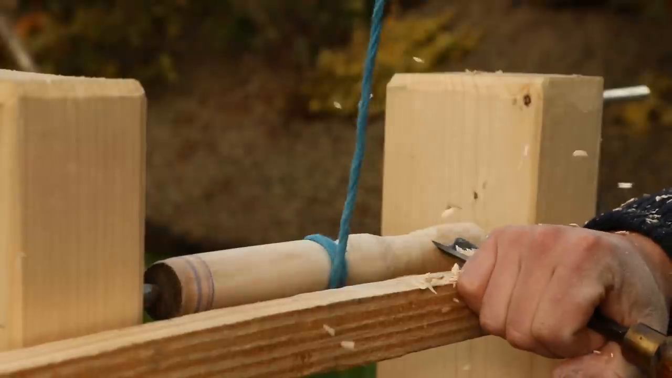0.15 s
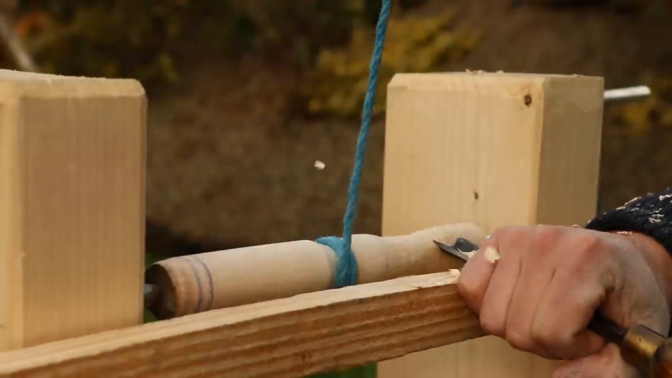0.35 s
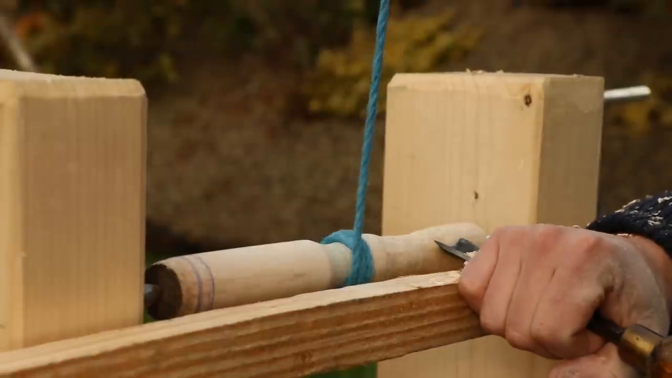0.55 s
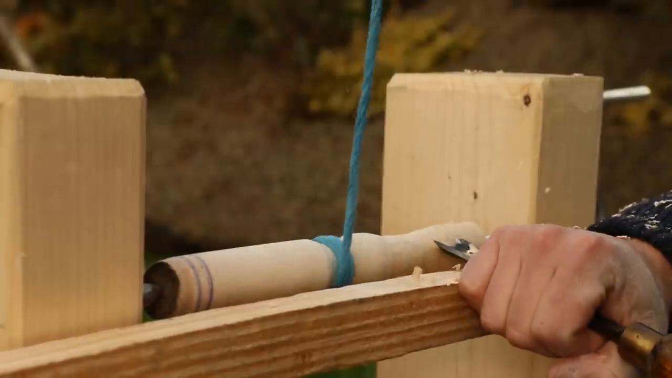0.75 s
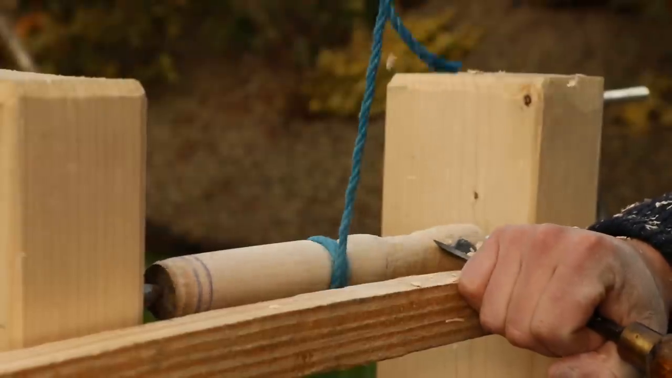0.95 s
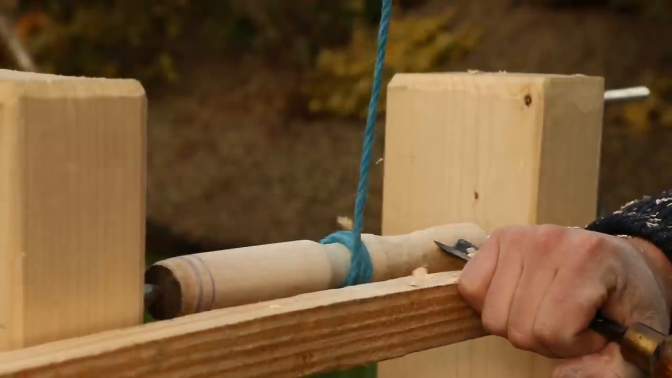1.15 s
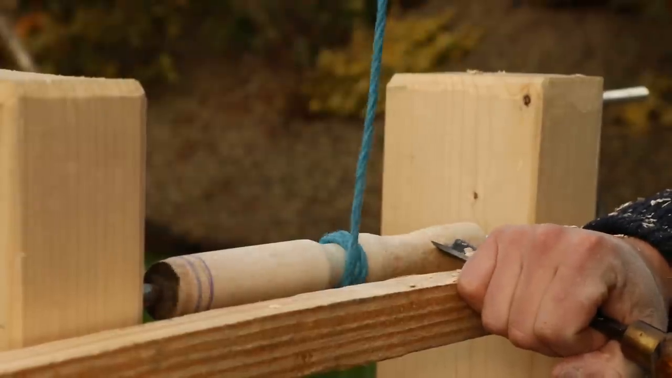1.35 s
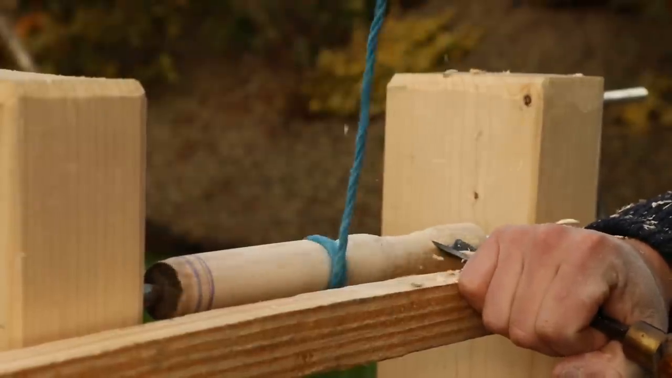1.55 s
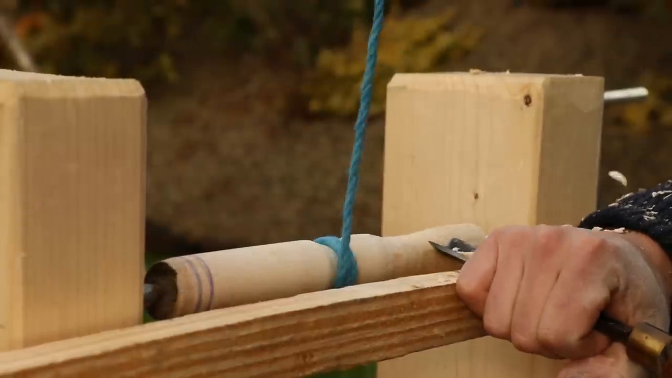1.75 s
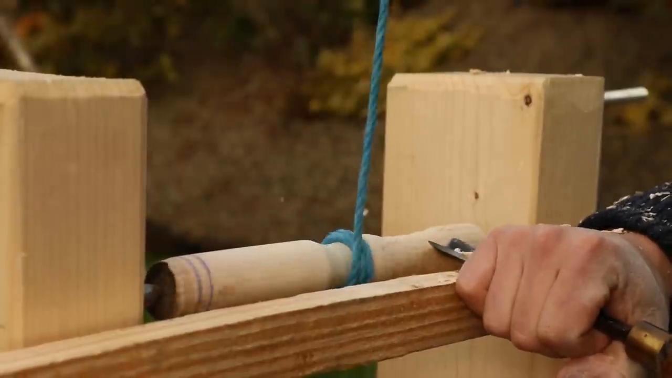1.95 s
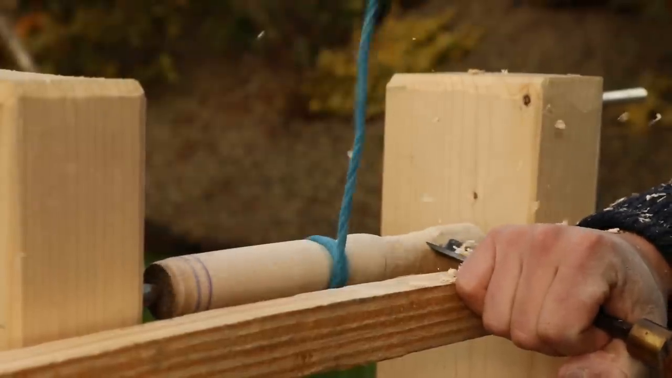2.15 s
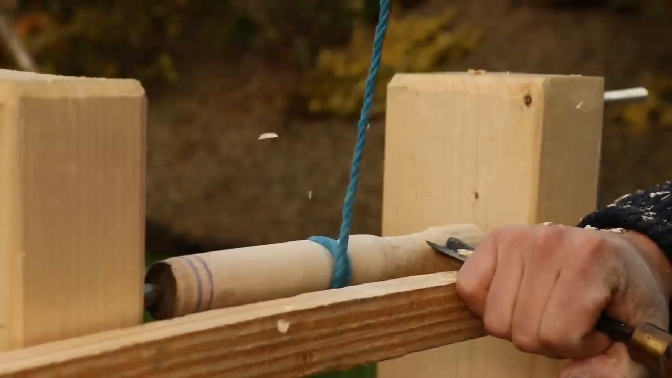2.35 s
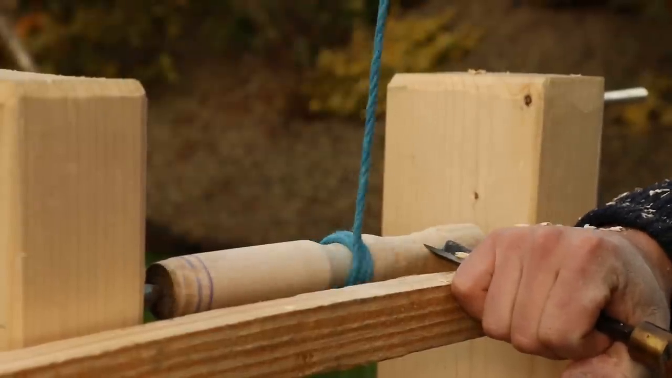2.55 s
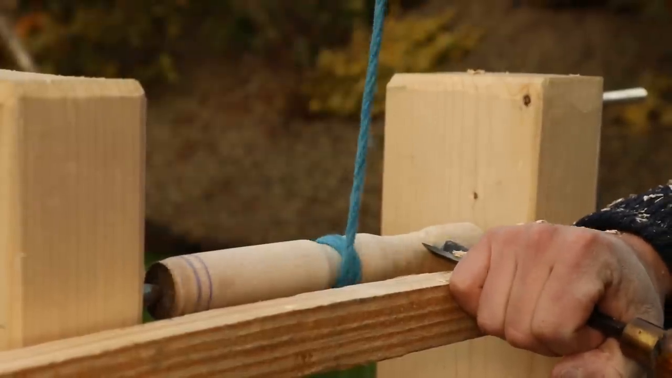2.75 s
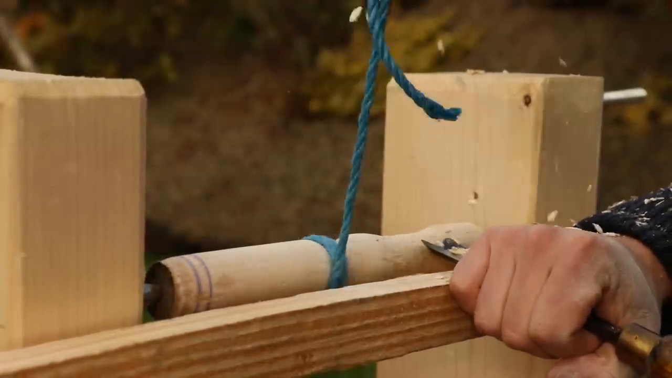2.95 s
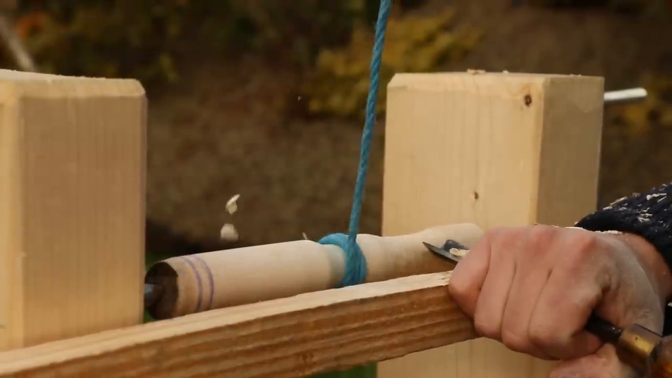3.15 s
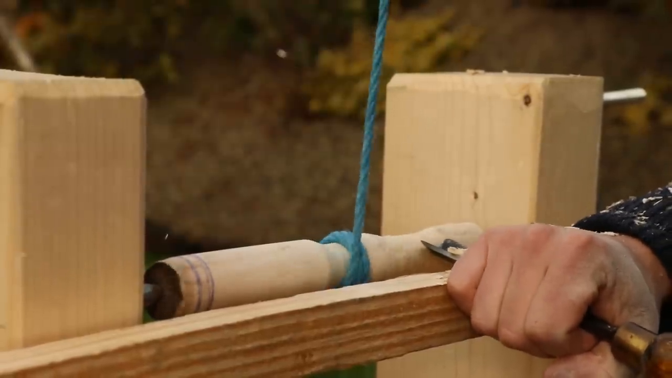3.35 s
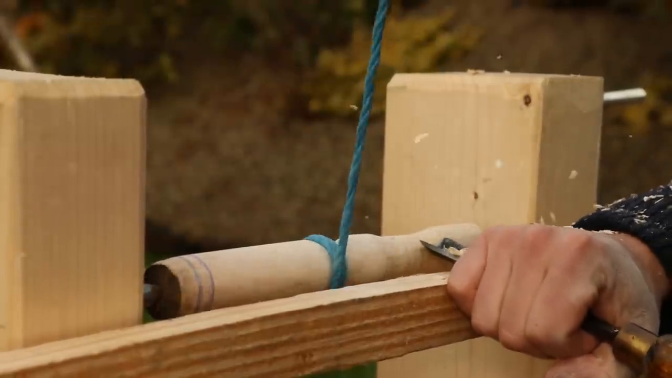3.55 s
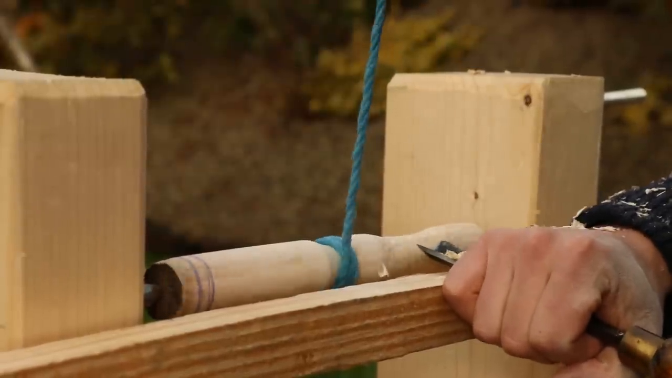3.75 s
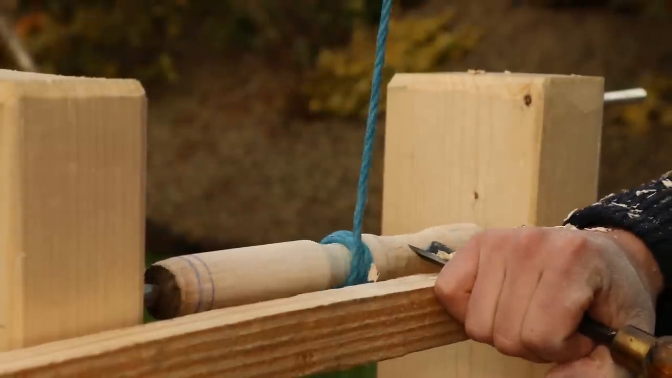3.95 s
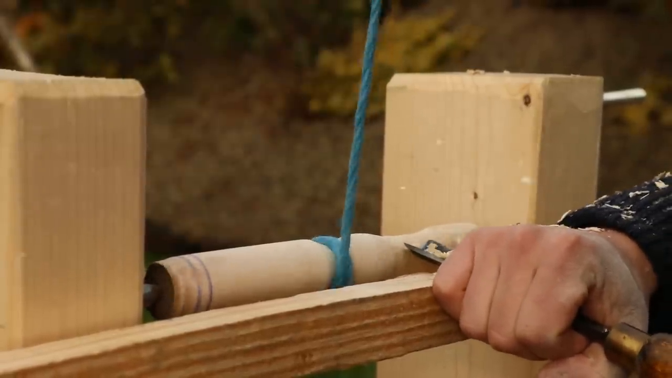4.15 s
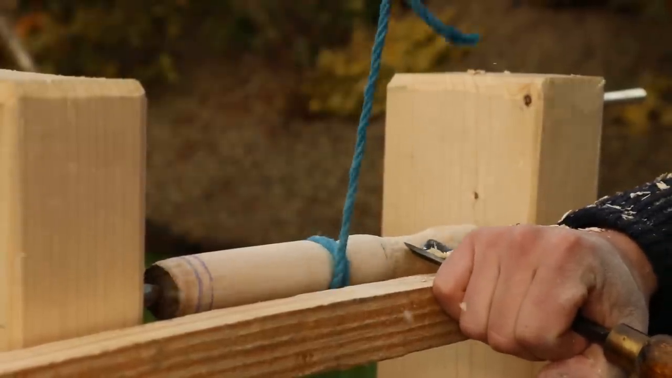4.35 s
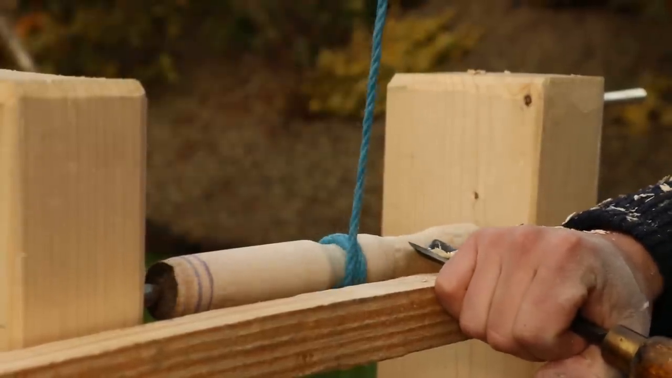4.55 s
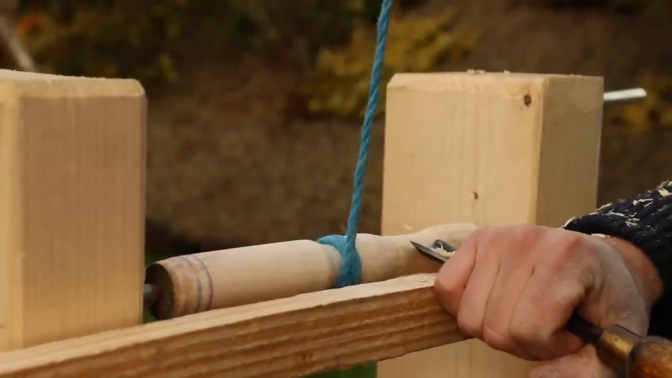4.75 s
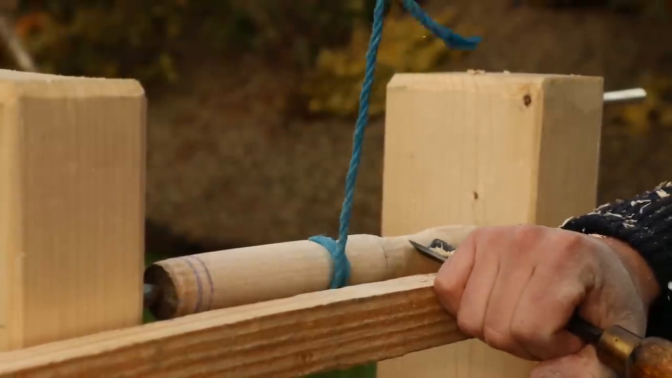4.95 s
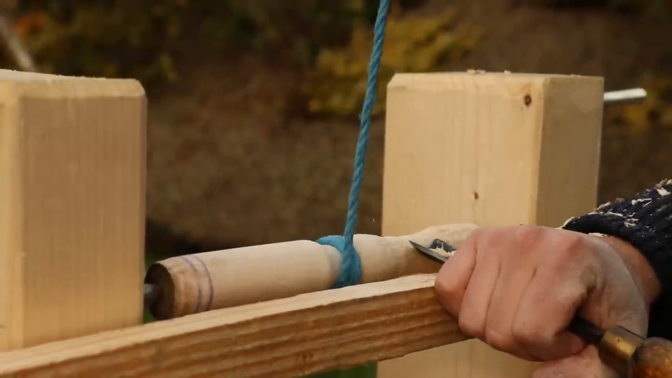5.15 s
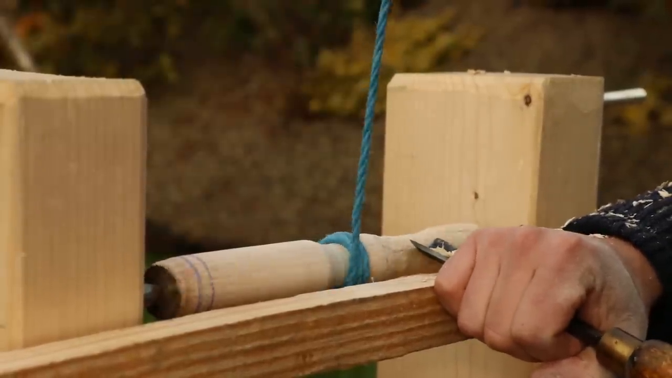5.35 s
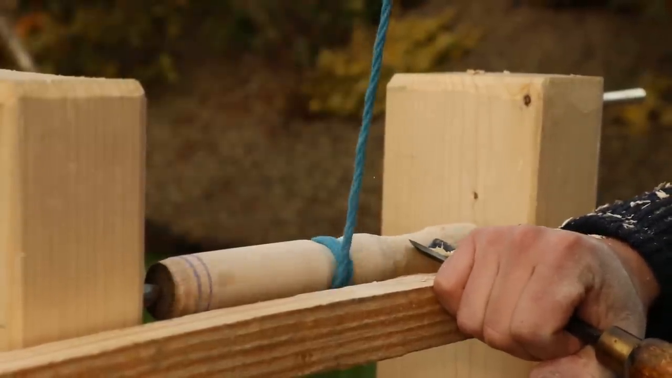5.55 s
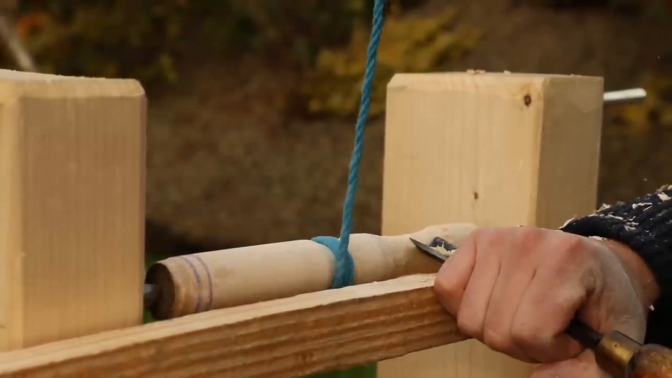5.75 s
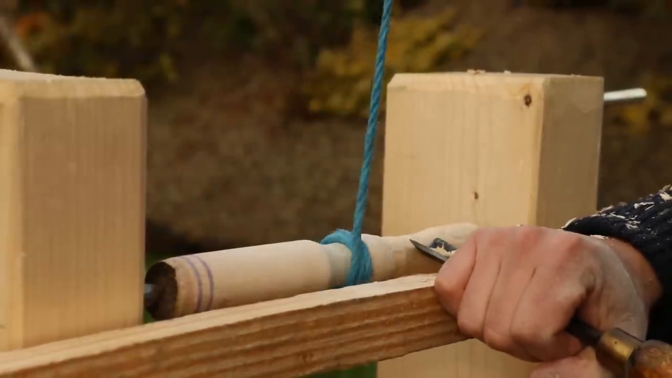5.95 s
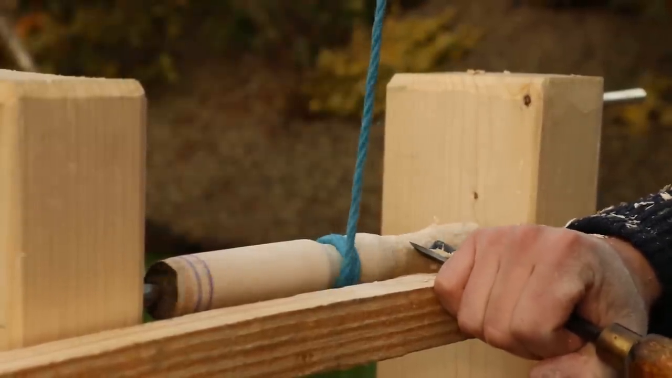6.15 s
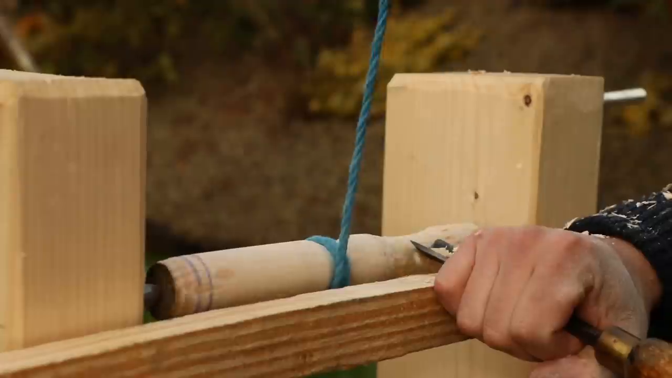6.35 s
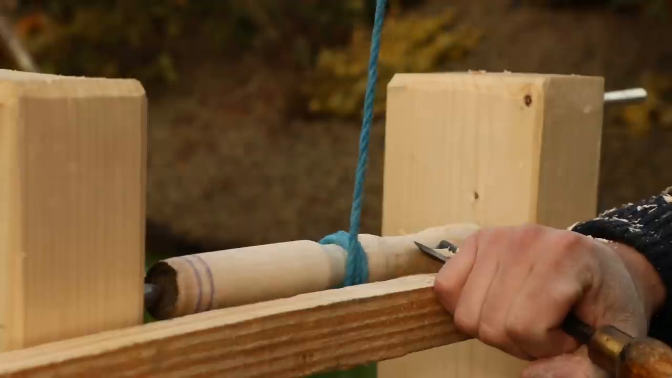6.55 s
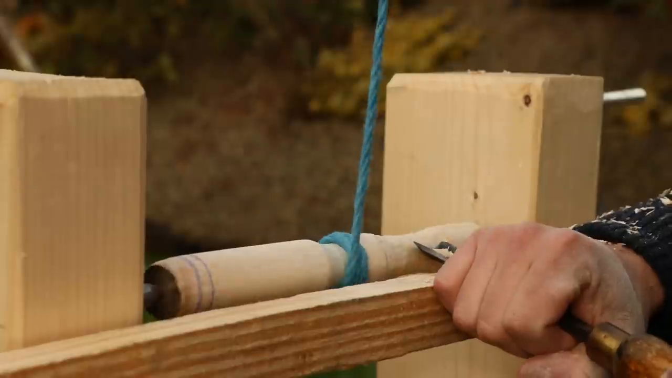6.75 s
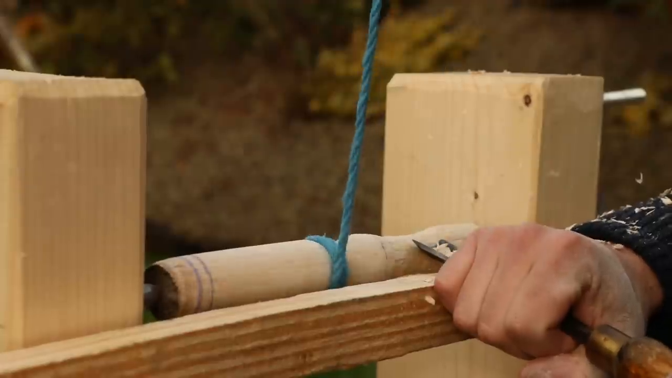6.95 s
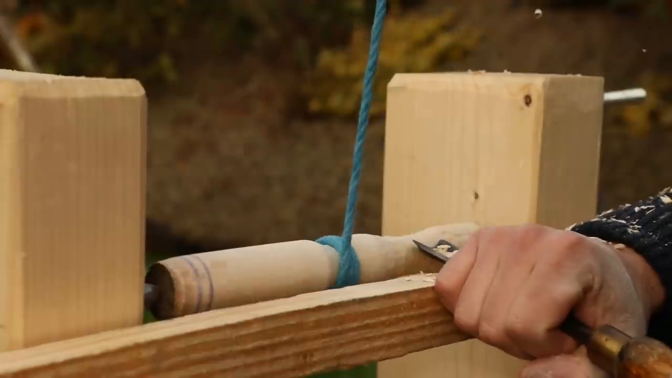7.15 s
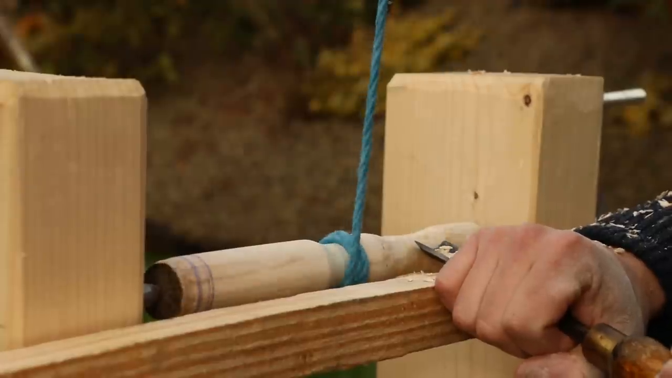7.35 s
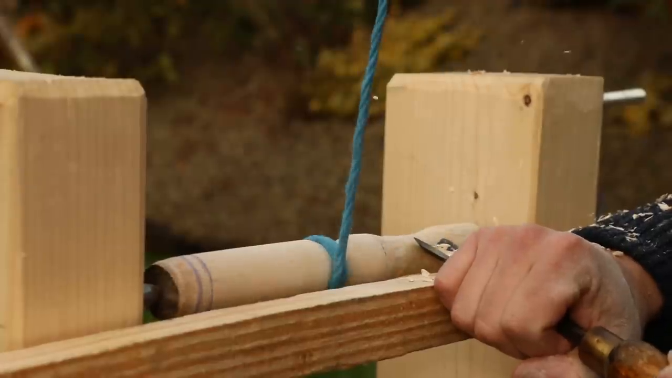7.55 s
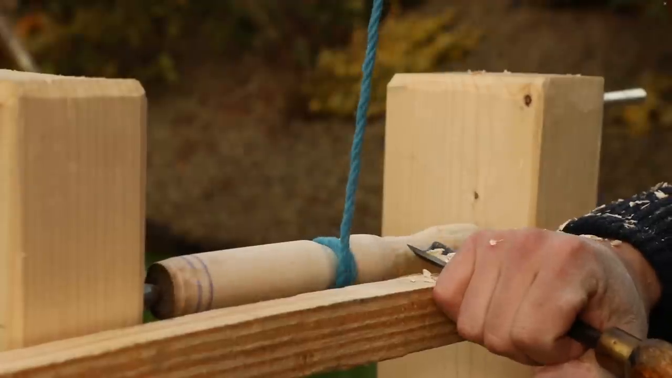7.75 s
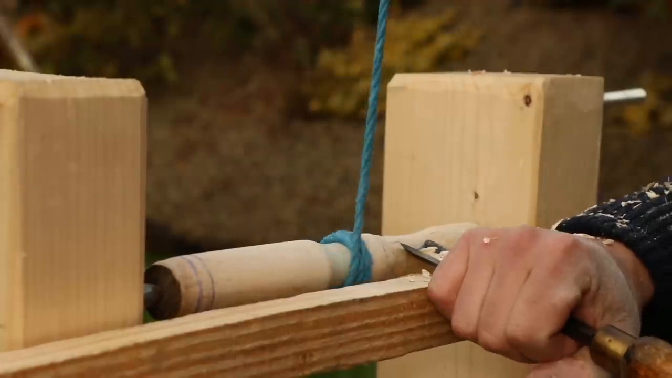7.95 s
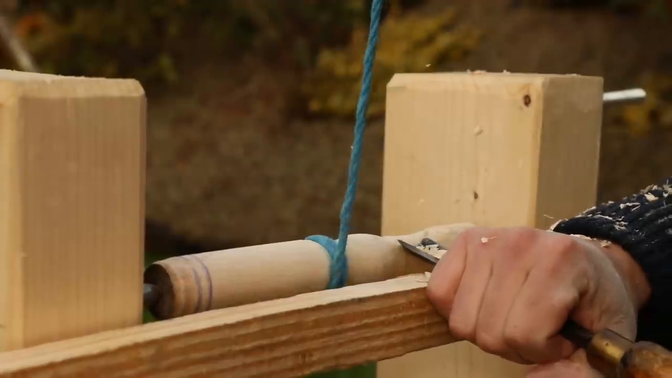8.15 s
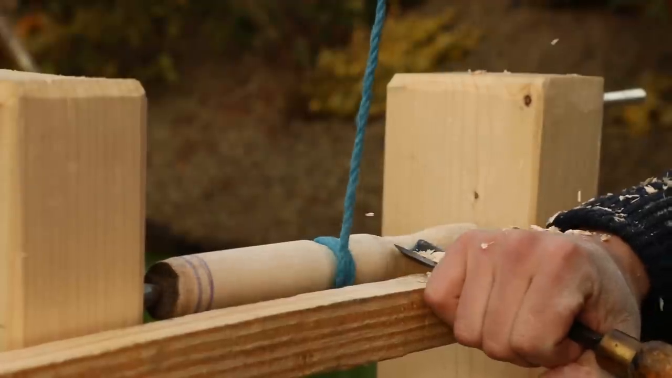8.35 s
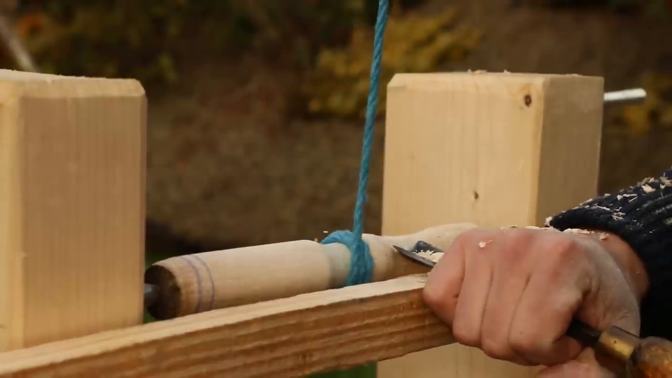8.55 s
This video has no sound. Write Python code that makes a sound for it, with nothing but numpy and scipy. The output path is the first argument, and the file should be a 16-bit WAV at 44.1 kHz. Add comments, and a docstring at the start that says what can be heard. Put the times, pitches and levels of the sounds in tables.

```python
"""Treadle lathe outdoors

A gouge cuts a spindle. On each push fibres tear under the edge: clumped random clicks shake frame, spindle and tool,
modelled as resonant filters. On the return the spindle rubs back more softly, knocks and sometimes squeaks. Noise
bursts make bites and knocks, short rings and puffs the ticks of chips and fibres, slowing slips the judder at some
halts. Dull echoes follow; a faint filtered-noise hiss and a low rumble lie below."""
import sys
import numpy as np
from scipy import signal
from scipy.fft import rfft, irfft
from scipy.io import wavfile
from scipy.ndimage import uniform_filter1d

SR = 44100
rng = np.random.default_rng(int(sys.argv[2]) if len(sys.argv) > 2 else 0)


def to_linear_factor(level_db):
    """Convert decibel levels (scalar or array-like) to linear amplitude factors."""
    exponent = np.asarray(level_db, float) / 20
    return 10 ** exponent


def dump(signal):
    """Clip the signal to [-1, 1] and save it as 16-bit WAV at the path in sys.argv[1]."""
    limited = np.clip(np.atleast_2d(signal).T, -1, 1)
    pcm = np.round(limited * 32767).astype(np.int16)
    wavfile.write(sys.argv[1], SR, pcm)


N = 378819
SPLIT_HZ = 1150, 3200   # bounds of the registers: frame rumble, spindle and tool, hiss

# Frame, spindle and tool while the edge cuts. Each row: frequency in Hz, relative level in dB.
CUT_COLOUR = [(59, -67.5), (100, -26.5), (210, -25.5), (282, -10), (469, -5.5), (673, 3), (925, -5.5),
              (2780, -4.5), (3370, -20), (5840, -27.5), (7060, -33), (11500, -37.5), (15800, -61)]
# Resonances and hollows of spindle, frame and tool. Each row: centre in Hz, width in Hz, lift cutting in dB,
# lift idle in dB.
BODY_MODES = [(290, 13.6, 7.5, 3.5), (385.4, 9.7, 2, 17), (543.3, 42.6, 3.5, 3.5), (690.3, 15.7, 5, 6.5),
              (837, 21, 5.5, 3), (1009.4, 29, 10, 14), (1354, 26, 3.5, 7), (1542, 130, 5, 3),
              (1760, 130, 0, 0), (2287, 44, -8.5, -40), (2398, 47, 6, 3.5), (2880, 255, 0, 2.5),
              (3568, 135, 9, 12), (3885, 103, 10, 15), (4584, 200, 11, -12), (4930, 150, -39, -7),
              (6060, 170, 6.5, 14), (7000, 600, 16.5, 9.5), (9010, 450, 8, 0), (11600, 76, 12, -6)]
# Returns, each setting off where a push halted. Each row: fastest in seconds, halt in seconds, then levels at full
# speed in dB of frame rumble, spindle and tool, hiss.
RETURN_STROKES = [(-.1, 0.066, -42, -43, -59), (0.567, 0.74, -34.5, -43, -58.5),
                  (1.196, 1.422, -39, -45, -56), (2.04, 2.112, -36.5, -42, -57),
                  (2.617, 2.794, -38.5, -45.5, -59), (3.27, 3.457, -38.5, -44.5, -58),
                  (3.885, 4.119, -38, -45.5, -57.5), (4.56, 4.758, -44.5, -47.5, -59.5),
                  (5.212, 5.487, -44, -49, -63.5), (5.933, 6.144, -40.5, -46.5, -58),
                  (6.593, 6.825, -41.5, -46.5, -58), (7.308, 7.454, -39, -44.5, -62),
                  (7.94, 8.075, -41, -45.5, -61.5), (8.588, 8.75, -38.5, -45.5, -61)]
# Pushes, each setting off where a return halted. Each row: edge enters, fastest, edge eases off, halt, all in seconds.
PUSH_TIMES = [(.122, .19, .265, .356), (.76, .87, .975, 1.042), (1.428, 1.585, 1.63, 1.732),
              (2.126, 2.23, 2.35, 2.392), (2.833, 2.9, 2.965, 3.066), (3.456, 3.55, 3.635, 3.735),
              (4.157, 4.23, 4.31, 4.428), (4.826, 4.92, 4.96, 5.035), (5.545, 5.62, 5.72, 5.772),
              (6.16, 6.31, 6.35, 6.407), (6.828, 6.97, 7.04, 7.08), (7.455, 7.56, 7.62, 7.72),
              (8.082, 8.19, 8.272, 8.347)]


def rms_one(x):
    """Scales a signal to an rms of 1."""
    return x / np.sqrt(np.mean(x ** 2) + 1e-20)


def drift(rate_hz):
    """Slow random wander of rms 1: noise through two equal one-pole low-passes."""
    r = np.exp(-2 * np.pi * rate_hz / SR)
    settle = 9000
    wander = signal.lfilter([1], [1, -2 * r, r * r], rng.standard_normal(N + settle))
    return rms_one(wander[settle:])


def level_at(hz, spectrum):
    """Reads a spectrum in dB, interpolated over log frequency."""
    points = np.array(spectrum)
    return np.interp(np.log(hz), np.log(points[:, 0]), points[:, 1])


def response(spectrum, modes, size=8192):
    """Causal (minimum-phase) impulse response of a smooth spectrum with resonances on it."""
    hz = np.arange(size // 2 + 1) * SR / size + 1
    level_db = level_at(hz, spectrum)
    for centre_hz, width_hz, lift_db in modes:
        level_db = level_db + lift_db / (1 + (2 * (hz - centre_hz) / width_hz) ** 2)   # bell-shaped lift
    cepstrum = irfft(np.log(to_linear_factor(level_db)))
    cepstrum[1:size // 2] *= 2
    cepstrum[size // 2 + 1:] = 0
    return irfft(np.exp(rfft(cepstrum)))[:size // 2]


def shake(force, impulse):
    """A force rings through an impulse response."""
    return signal.fftconvolve(force, impulse)[:N]


def outdoor_hiss(rms_db=-64):
    """Outdoor air: steady noise through a fixed spectrum."""
    # Each row: frequency in Hz, relative level in dB.
    hiss_colour = [(30, -46), (120, -12), (300, 3.5), (550, -8), (1500, -5.5), (3500, -18), (5300, -34),
                   (8000, -42), (11500, -20), (15800, -47)]
    hiss = shake(rng.standard_normal(N), response(hiss_colour, []))
    return to_linear_factor(rms_db) * rms_one(hiss)


def outdoor_rumble(top_hz=53.5, rms_db=-67):
    """Low outdoor rumble: steady low-passed noise, before the bass cut in record()."""
    lowpass = signal.butter(4, top_hz, fs=SR, output="sos")
    return to_linear_factor(rms_db) * rms_one(signal.sosfilt(lowpass, rng.standard_normal(N)))


def registers(colour, modes):
    """A body's response split into low, middle and high parts."""
    body = response(colour, modes)
    cuts = [(SPLIT_HZ[0], "low"), (SPLIT_HZ, "band"), (SPLIT_HZ[1], "high")]
    return [signal.sosfilt(signal.butter(3, hz, kind, fs=SR, output="sos"), body) for hz, kind in cuts]


def tearing(per_s, spread_db):
    """Fibres let go as dense uneven clicks of random size and sign."""
    size_db = spread_db * np.minimum(rng.exponential(1, N), 4)
    sizes = to_linear_factor(size_db) * rng.choice([-1, 1], N)
    return rms_one(sizes * (rng.random(N) < per_s / SR))


def singing(force, colour, modes, share_db, wander_db):
    """As the contact point moves, each resonance is driven now harder, now less."""
    out = np.zeros(N)
    for hz, width_hz, lift_db in modes:
        peak_db = level_at(hz, colour) + lift_db + share_db
        drive = force * to_linear_factor(peak_db + wander_db * drift(23.4))
        r = np.exp(-np.pi * width_hz / SR)
        poles = [1, -2 * r * np.cos(2 * np.pi * hz / SR), r * r]
        out += signal.lfilter((1 - r * r) / 2 * np.array([1, 0, -1]), poles, drive)
    return out


def friction(gains, colour, modes, per_s, slow_db, fast_db, smooth, hiss_depth):
    """One train of clumped clicks, plus noise, drives every register of the body under its own gain."""
    clicks = tearing(per_s, spread_db=3.5)
    clump_db = slow_db * drift(28.0) + fast_db * drift(84.0)
    edges_hz, out = (0, *SPLIT_HZ, SR), 0
    for k, (part, depth) in enumerate(zip(registers(colour, modes), (1, 1, hiss_depth))):
        grains = depth * clicks + smooth * rng.standard_normal(N)
        force = rms_one(to_linear_factor(depth * clump_db) * grains) * gains[k] / np.linalg.norm(part)
        ringing = [m for m in modes if edges_hz[k] < m[0] < edges_hz[k + 1] and m[2] > 0]
        out = out + shake(force, part) + singing(force, colour, ringing, share_db=-7.0, wander_db=4.0)
    return out


def high_spots_db():
    """High spots of the spindle press past the edge: a quick swell with a slower fall; hollows dip."""
    # Each row: peak in seconds, length in seconds, rumble lift in dB, hiss lift in dB (negative: a hollow).
    spots = [(0.35, 0.028, 9, 7), (1.069, 0.06, 20, 5), (1.26, .03, 7, -6), (1.32, .03, 4.5, 12.5),
             (1.399, 0.079, 25, 8), (1.495, 0.05, 10.5, 6), (1.524, 0.066, -5.5, -21),
             (1.765, 0.097, 15.5, 0), (2.062, 0.15, 5, 5), (2.623, 0.026, 0.5, -4), (2.685, 0.037, 6, -13),
             (2.959, 0.024, -5, -22), (3.007, .04, 9.5, -4), (3.06, 0.023, 8, 6), (3.103, 0.04, 15.5, 0),
             (3.172, 0.038, 5.5, -3), (3.24, 0.02, 3.5, -3), (3.367, 0.064, 11.5, 2),
             (3.557, 0.024, 3, -25), (4.04, 0.058, 11.5, 0), (4.529, 0.094, 6, 1), (4.695, 0.028, 7, -6),
             (5.139, 0.059, 14, 7), (5.24, 0.053, 14, 5), (5.93, 0.042, 9, -6), (5.974, 0.034, 5, -2),
             (5.985, .03, 5, -2), (6.33, 0.029, 2, -3), (6.575, 0.038, 8, 2), (6.633, 0.043, 12.5, -10),
             (6.701, 0.03, 14, 1), (7.018, 0.041, 10, 7.5), (7.119, .04, 6, 24), (7.19, .03, 2, -2),
             (7.316, 0.02, 5, 7), (7.263, 0.044, 8, -3), (7.394, .04, 7.5, 10), (7.868, 0.037, 8.5, -7),
             (7.992, 0.032, 5.5, 14), (8.26, 0.021, 1, -7), (8.427, 0.021, 4, 16),
             (8.482, 0.042, 12.5, -11), (8.562, .03, 10, -5)]
    t, lift_db = np.arange(N) / SR, np.zeros((3, N))
    for s, length_s, low_db, hiss_db in spots:
        on = slice(max(round((s - length_s) * SR), 0), round((s + length_s * 2) * SR))
        corners_s = [s - 0.49 * length_s, s, s + 0.58 * length_s]
        swell = np.sin(np.interp(t[on], corners_s, [0, np.pi / 2, np.pi])) ** 2
        middle_db = .45 * low_db + .4 * hiss_db
        lift_db[:, on] += np.c_[[low_db, middle_db, hiss_db]] * swell
    return lift_db


def rests_db(rest_db=-4.5, rest_s=0.021):
    """The spindle stands still for a moment at the top of the treadle: a short hush as each return ends."""
    t = np.arange(N) / SR
    return sum(rest_db * np.exp(-((t - row[1]) / rest_s) ** 2) for row in RETURN_STROKES)


def stroke_gains(spans, slow_db, peaking):
    """Speed swells and sinks as two quarter sines; each register's level climbs with it from slow to peak."""
    approach_db = -17   # the spindle already rubs before the edge enters
    eased_db = np.c_[[0, -2.5, -5]]   # the cut thins to a scrape, per register
    t, gains = np.arange(N) / SR, np.zeros((3, N))
    slow_db, peaking = np.c_[list(slow_db)], np.c_[list(peaking)]
    for off_s, enter_s, fastest_s, ease_s, halt_s, easing, peak_db in spans:
        on = (t >= off_s) & (t < halt_s)
        phase = np.interp(t[on], [off_s, fastest_s, halt_s], [0, np.pi / 2, np.pi])
        speed = np.sin(phase).clip(0)
        edge_db = approach_db * (t[on] < enter_s) + easing * eased_db * (t[on] > ease_s)
        gains[:, on] = to_linear_factor(slow_db + (np.c_[peak_db] - slow_db) * speed ** peaking + edge_db)
    return uniform_filter1d(gains, size=90, axis=1) * to_linear_factor(high_spots_db() + rests_db())


def return_gains():
    """The idle rub lasts from a push's halt to its own."""
    first_off_s = -.3
    offs_s = [first_off_s] + [times[3] for times in PUSH_TIMES]
    spans = [(off_s, off_s, fastest_s, halt_s, halt_s, 0, levels_db)
             for off_s, (fastest_s, halt_s, *levels_db) in zip(offs_s, RETURN_STROKES)]
    # peaking: exponent on speed per register, under 1 = a broad top
    return stroke_gains(spans, slow_db=(-59.5, -65.5, -70.5), peaking=(0.91, 0.43, 0.61))


def idle_rub():
    """The spindle runs back idle: sparser, smoother friction into the idle body."""
    # Each row: frequency in Hz, relative level in dB.
    idle_colour = [(59, -61), (100, -42), (265, -16.5), (405, -23), (511, -1), (1190, -16), (1300, -11.5),
                   (2300, -12.5), (2560, -14.5), (4620, -47), (11000, -30.5), (15800, -53)]
    modes = [(hz, width_hz, idle_db) for hz, width_hz, cut_db, idle_db in BODY_MODES]
    return friction(return_gains(), idle_colour, modes, per_s=900.0, slow_db=2.5, fast_db=0.97,
                    smooth=1.0, hiss_depth=0.74)


def yard(x):
    """A few dull echoes from ground and fence."""
    dull = signal.lfilter([.3], [1, -.7], x)
    echoes = [(.0063, -18), (.017, -25), (.034, -16)]   # delay s, dB
    return sum(to_linear_factor(db) * np.pad(dull, (round(s * SR), 0))[:N] for s, db in echoes)


def cutting_modes():
    """The body's resonances with their lifts while cutting."""
    return [(hz, width_hz, cut_db) for hz, width_hz, cut_db, idle_db in BODY_MODES]


def bites(rise_s=0.00095, burst_s=0.0057, bright_s=0.0016, size=1500):
    """The edge bites or the spindle knocks: a short force burst into the body; its bright part dies sooner."""
    # Each row: time in seconds, peak of the dull part in dB, peak of the bright part over it in dB.
    blows = [(0.049, -31, -2), (0.124, -7.5, -27), (0.164, -3.5, -18), (0.19, -7, -32), (0.432, -23.5, -12),
             (0.497, -18, -13), (0.554, -18, -14), (0.612, -19, -11.5), (0.68, -23, -12),
             (0.782, -19.5, -20), (0.819, -12, -21), (0.841, -0.5, -20), (1.064, -22.5, -18),
             (1.179, -18, -10.5), (1.468, -20, 0), (1.48, -10, -16), (1.548, -7.5, -7), (1.591, -1, -26),
             (2.015, -25, -10), (2.127, -20.5, -11), (2.15, -11, -11), (2.279, -12.5, -26),
             (2.834, -14, -5), (2.862, -8.5, -26), (3.489, -25, -12), (3.503, -14.5, -27), (3.524, -3, -18),
             (3.572, -7.5, -30), (4.16, -25, -24), (4.189, -14, -21), (4.276, -21, -20), (4.492, -32, -6.5),
             (5.572, -19.5, 0), (6.249, -23, -13), (6.321, -10, -26), (6.906, -9.5, -12.5),
             (6.952, -15, -17), (6.968, -6.5, -14), (7.178, -31, -27), (7.254, -24.5, -16),
             (7.467, -38, -12), (7.509, -26, -12), (7.547, -14, -17), (8.097, -26.5, -15),
             (8.131, -27, -19), (8.147, -11.5, -14), (8.198, -11, -23), (8.472, -30.5, -32)]
    low_part, middle_part, high_part = registers(CUT_COLOUR, cutting_modes())
    t = np.arange(size) / SR
    noise = rng.standard_normal((len(blows), size))
    bursts = noise * (1 - np.exp(-t / rise_s)) * np.exp(-t / burst_s)
    dull = signal.fftconvolve(bursts, [low_part + middle_part], axes=1)
    bright = signal.fftconvolve(bursts * np.exp(-t / bright_s), [high_part], axes=1)
    out = np.zeros(N + dull.shape[1])
    for (s, db, bright_db), low, top in zip(blows, dull, bright):
        blow = low / np.abs(low).max() + to_linear_factor(bright_db) * top / np.abs(top).max()
        out[round(s * SR) - 30:][:len(blow)] += to_linear_factor(db) * blow
    return out[:N]


def ticks(cycles=8.2, size=200):
    """Chips and fibres snap: a sharp puff of noise and a ring of a few cycles, band-passed."""
    # Each row: start in seconds, ring level before the band-pass in dB, centre in Hz.
    snaps = [(0.0505, -31, 7300), (0.495, -33.5, 6800), (0.5526, -38.5, 9810), (0.7284, -34, 7200),
             (2.0433, -35, 7130), (3.386, -35.5, 7500), (3.4844, -35, 7060), (3.8172, -43, 9860),
             (4.0328, -37, 9500), (5.9439, -41, 10900), (6.395, -33, 10000), (7.9834, -33, 10100),
             (8.022, -34.5, 10400)]
    out, t = np.zeros(N + size), np.arange(size) / SR
    for (s, db, hz), puff in zip(snaps, rng.standard_normal((len(snaps), size))):
        ring = np.sin(2 * np.pi * hz * t) * np.exp(-t * hz / cycles)
        out[round(s * SR):][:size] += to_linear_factor(db) * (ring + 1.4 * puff * np.exp(-t / 0.0009))
    return signal.sosfilt(signal.butter(2, [2500, 12000], "band", fs=SR, output="sos"), out[:N])


def push_gains():
    """The edge cuts from its entry, eases off and scrapes on to the halt."""
    # How hard each push cuts. Each row: frame rumble peak in dB, edge hiss peak in dB, easing as a share of the usual.
    efforts = [(-21.5, -35, 0.56), (-21, -43, .9), (-20, -39.5, 1.3), (-18.5, -36.5, 0.39),
               (-19, -34.5, 0.52), (-23.5, -33.5, 1.9), (-31, -32.5, 1.6), (-34, -41.5, .4),
               (-35, -45.5, 0.53), (-27.5, -33.5, 1.3), (-28, -40, 3.8), (-30, -42.5, 2), (-27, -35.5, 2.3)]
    tool_db, tool_gain_per_db, mean_cut_db = -1, 0.29, -27.5   # heavier cuts ring spindle and tool more
    spans = []
    for times_s, (db, hiss_db, easing), before in zip(PUSH_TIMES, efforts, RETURN_STROKES):
        middle_db = db + tool_db + tool_gain_per_db * (db - mean_cut_db)
        spans.append((before[1], *times_s, easing, [db, middle_db, hiss_db]))
    return stroke_gains(spans, slow_db=(-44, -44.5, -49), peaking=(1.11, 1, 1.9))


def cutting():
    """Fibres tear under the edge: dense, clumped friction into the cutting body."""
    return friction(push_gains(), CUT_COLOUR, cutting_modes(), per_s=1800.0, slow_db=.6, fast_db=3.0,
                    smooth=0.75, hiss_depth=1.0)


def dust(per_s=12.0, level_db=-52):
    """Tiny bright ticks at random moments: decaying noise puffs, band-passed."""
    clicks = (rng.random(N) < per_s / SR) * to_linear_factor(level_db + 3.5 * rng.standard_normal(N))
    puffs = shake(clicks, np.exp(-np.arange(60) / SR / 0.00055)) * rng.standard_normal(N)
    return signal.sosfilt(signal.butter(2, [6500, 14000], "band", fs=SR, output="sos"), puffs)


def squeaks():
    """Short wavering tones glide up on the return, with overtones where wood creaks."""
    # Each row: start in seconds, length in seconds, from Hz, to Hz, level in dB, fall per overtone in dB.
    glides = [(1.165, .065, 4200, 4900, -50, -40), (1.855, .03, 4100, 4800, -54, -40),
              (3.825, .03, 4400, 4650, -52, -40), (3.915, .03, 3500, 3900, -51, -40),
              (1.792, .012, 3850, 3900, -52, -40), (6.095, .045, 240, 330, -51, -10),
              (7.11, .045, 760, 980, -43, -5)]
    out, waver, flutter = np.zeros(N), drift(150.0), drift(200.0)
    for s, length_s, from_hz, to_hz, db, fall_db in glides:
        at, along = round(s * SR), np.linspace(0, 1, round(length_s * SR))
        span = slice(at, at + len(along))
        hz = (from_hz + (to_hz - from_hz) * np.sqrt(along)) * (1 + .025 * waver[span])
        phase = 2 * np.pi * np.cumsum(hz) / SR
        overtones = [k for k in range(5) if (k + 1) * to_hz < SR / 4]
        tone = sum(to_linear_factor(fall_db * k) * np.sin((k + 1) * phase) for k in overtones)
        swell = np.sqrt(np.sin(np.pi * along).clip(0))
        out[span] += to_linear_factor(db + 0.76 * flutter[span]) * swell * tone
    return out


def judder():
    """Stick and slip as the spindle stops: the slips come slower and harder until it halts."""
    # Each row: start in seconds, length in seconds, slips per second at first, at last, relative level in dB.
    runs = [(4.375, .052, 300, 110, -30), (4.988, .044, 420, 110, -30), (5.722, .047, 420, 90, -30),
            (8.295, .048, 300, 110, -38)]
    # Each row: frequency in Hz, relative level in dB.
    tool_colour = [(880, -38), (1500, -7), (2080, 10.5), (3300, -16), (4180, 8), (5040, -22), (6970, -6),
                   (10000, -11), (11000, 1), (15800, -36)]
    slips = np.zeros(N)
    for s, length_s, first, last, db in runs:
        along = np.linspace(0, 1, round(length_s * SR))
        rate = first + (last - first) * along
        count = np.floor(np.cumsum(rate[::-1] / SR))[::-1]   # counted from the halt back
        slips[round(s * SR):][:len(along) - 1] = (np.diff(count) < 0) * to_linear_factor(db + 8.9 * along[1:])
    scuffs = shake(slips, np.exp(-np.arange(80) / SR / 0.00031)) * rng.standard_normal(N)
    tool = response(tool_colour, [])
    return to_linear_factor(-7.5) * shake(scuffs + 2.5 * slips, tool / np.linalg.norm(tool))


def scene():
    """The lathe with its echoes over the outdoor hiss and rumble."""
    lathe = idle_rub() + bites() + ticks() + cutting() + dust() + squeaks() + judder()
    return (lathe + yard(lathe) + outdoor_hiss() + outdoor_rumble())[None]


def low_pass(x):
    """Removes everything above the highest recorded frequency."""
    return signal.sosfilt(signal.butter(12, 16660, fs=SR, output="sos"), x)


def record(dry):
    """Peaks are rounded and clipped near full scale, then the deep bass and the top are cut."""
    rounded = 1.35 * np.tanh(dry / 1.35).clip(-.72, .72)
    thin = signal.sosfilt(signal.butter(2, 115, "high", fs=SR, output="sos"), rounded)
    mix = signal.sosfilt(signal.cheby2(20, 50, 15800, fs=SR, output="sos"), thin)
    return low_pass(mix)


dry = scene()
out = record(dry)
dump(out)
```